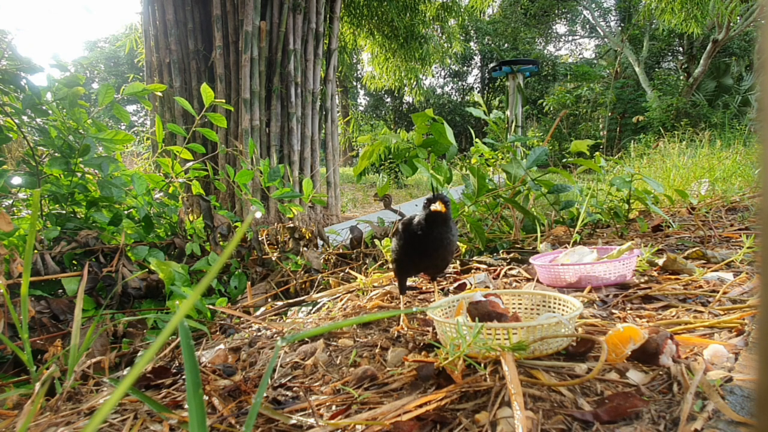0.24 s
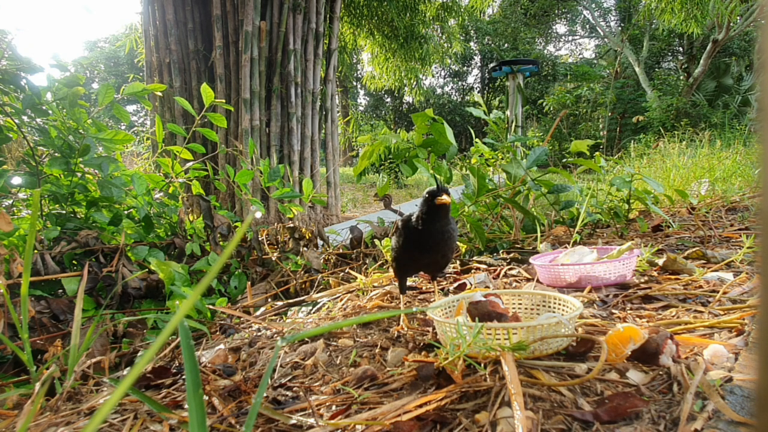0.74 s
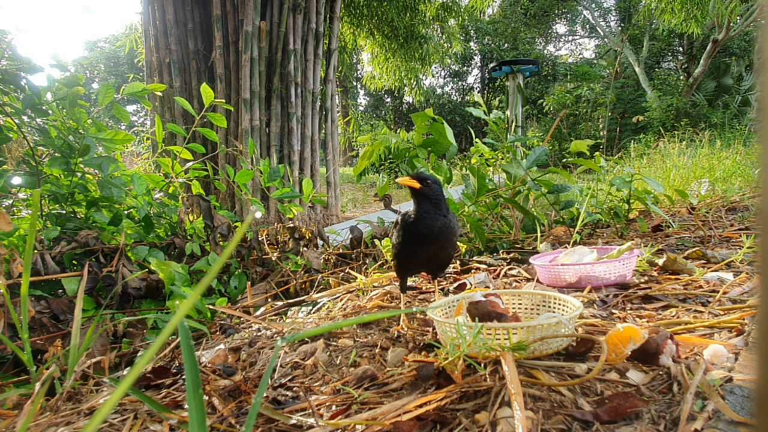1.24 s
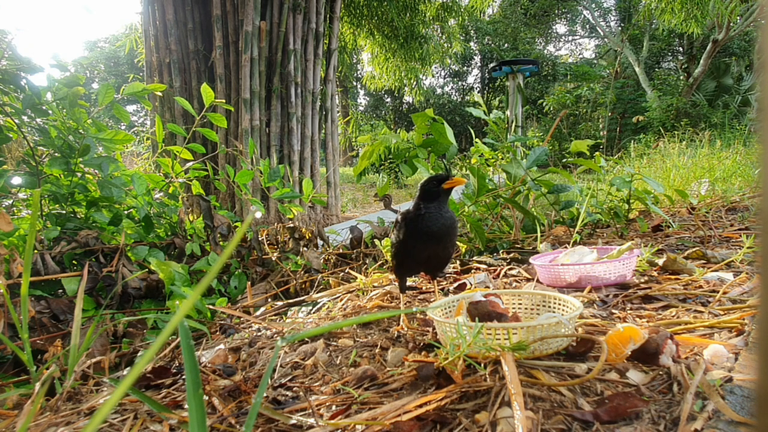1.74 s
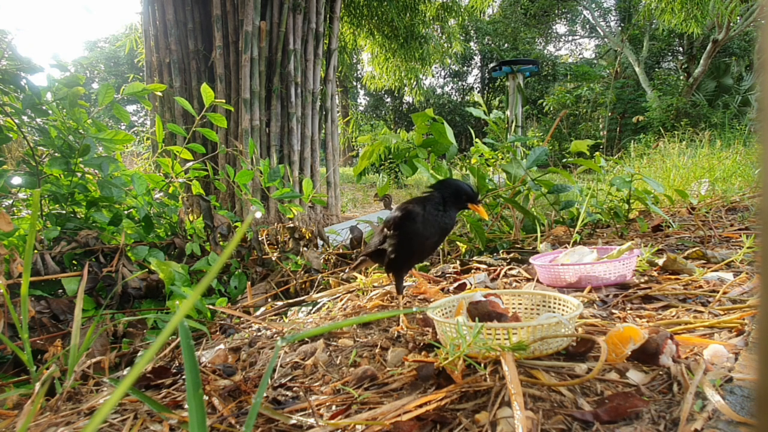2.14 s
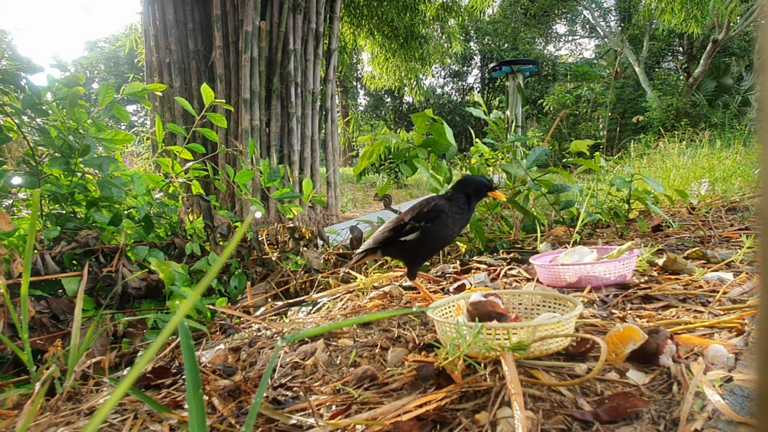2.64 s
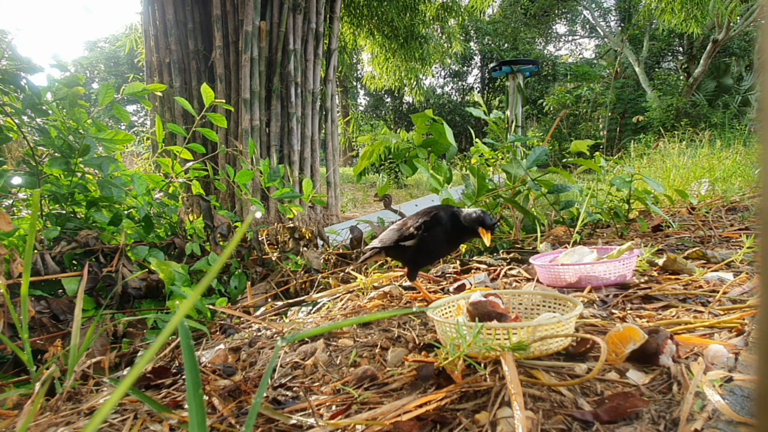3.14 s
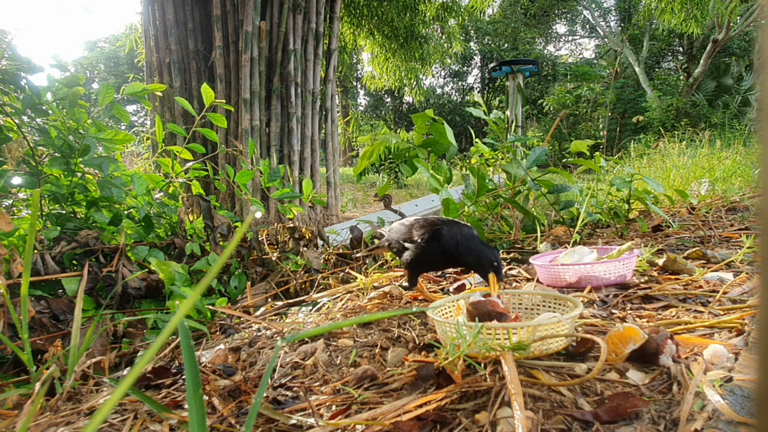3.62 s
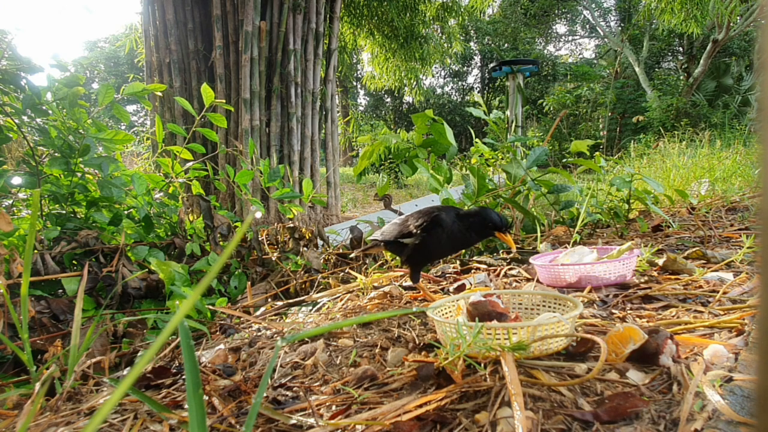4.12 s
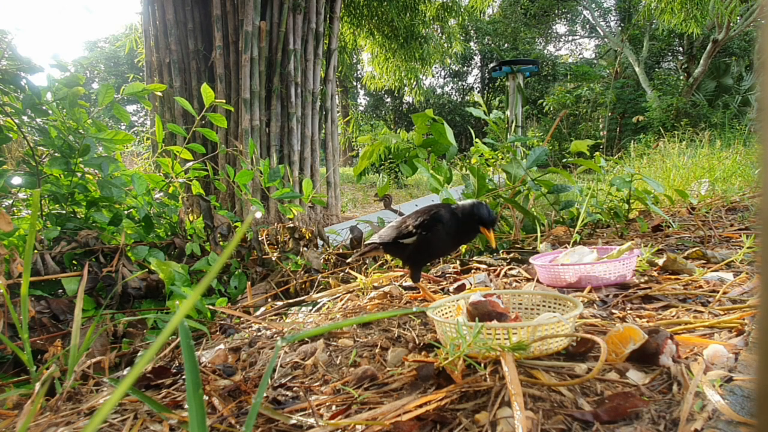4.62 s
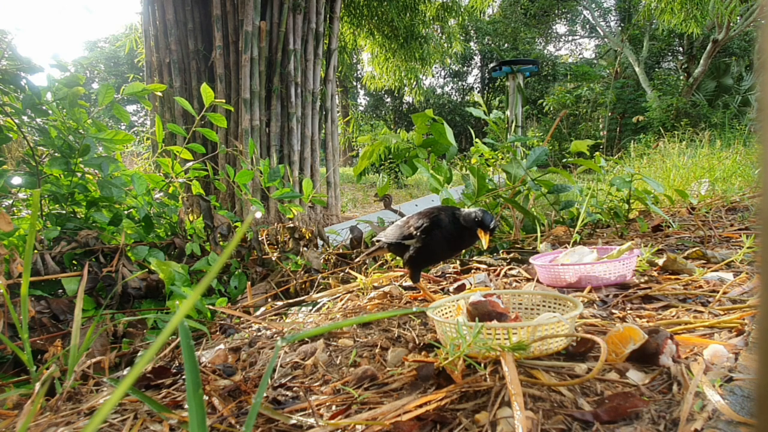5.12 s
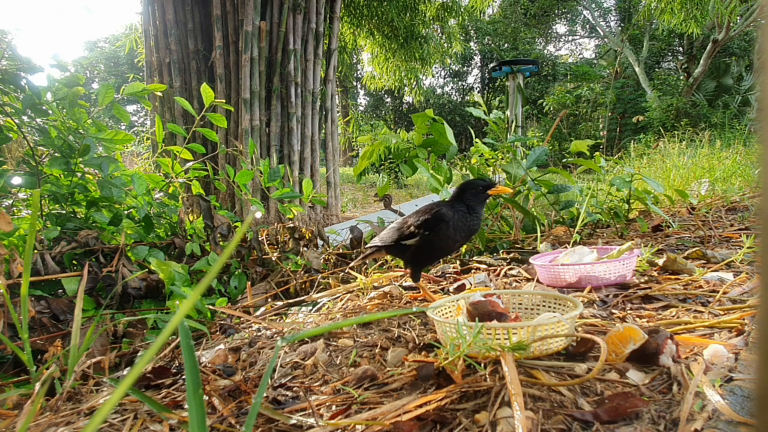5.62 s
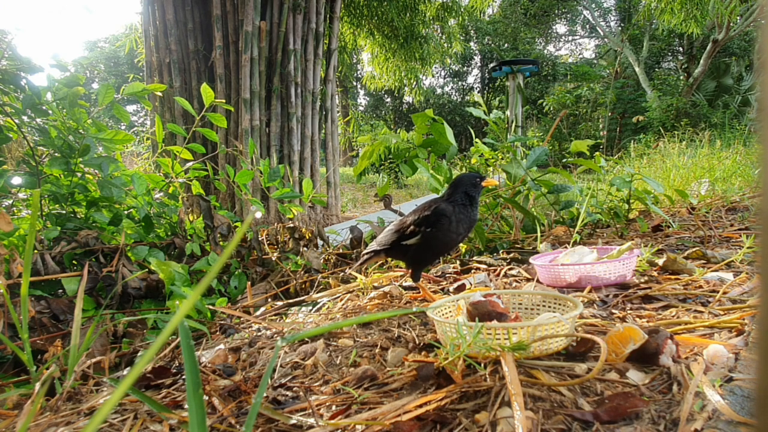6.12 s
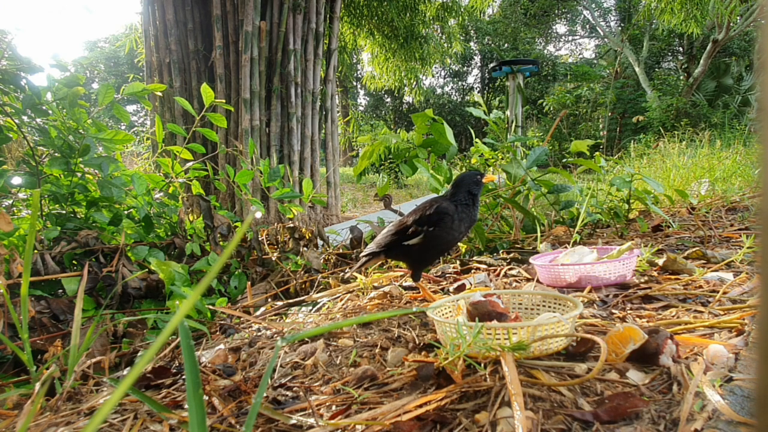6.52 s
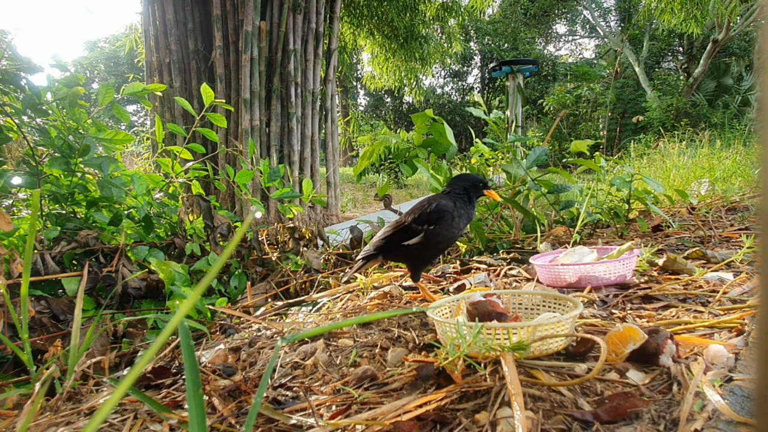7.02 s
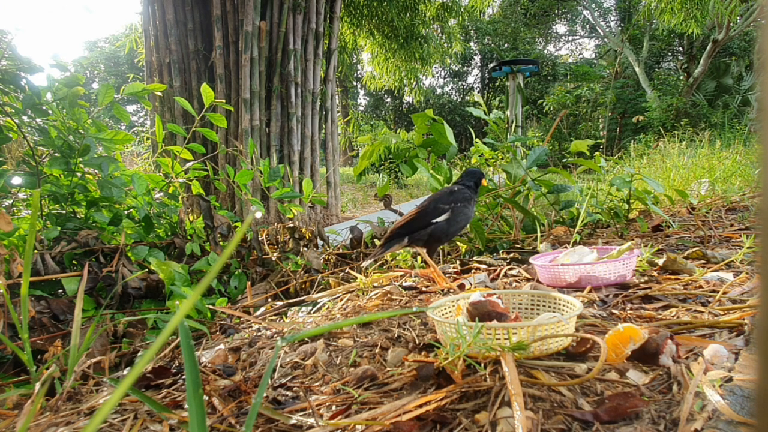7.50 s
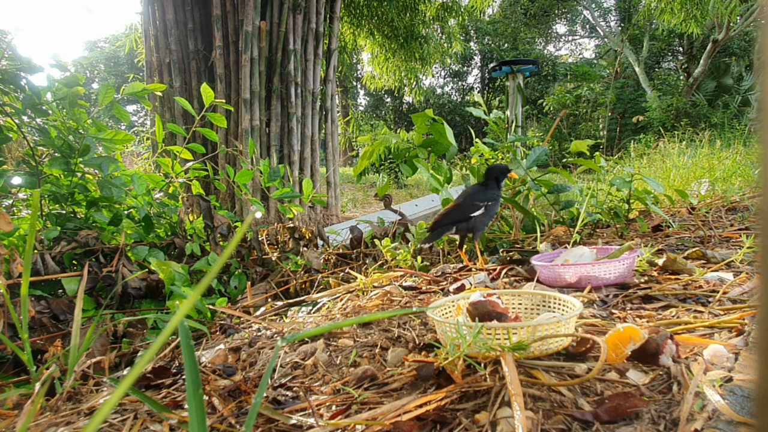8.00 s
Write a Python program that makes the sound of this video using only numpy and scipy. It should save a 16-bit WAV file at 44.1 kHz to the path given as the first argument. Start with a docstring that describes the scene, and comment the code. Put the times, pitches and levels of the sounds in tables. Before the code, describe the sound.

Doves coo near and far in a leafy garden while small birds whistle, a close myna squawks harshly, and low traffic rumbles beneath.

```python
"""Doves coo near and far in a tropical garden: pitch-curved near sines, purring notes chopped unevenly.
Small birds whistle from several perches; a close myna squawks three times, slide into buzz.
A bird steps through dry leaves: crackling noise bursts. Insects, air and far traffic are shaped noise.
The stereo microphone lies on the ground: its left port faces the trees, the right one is shaded."""
import sys
import numpy as np
from scipy import signal
from scipy.fft import rfft, irfft
from scipy.io import wavfile
from scipy.ndimage import uniform_filter1d

SR = 44100
rng = np.random.default_rng(int(sys.argv[2]) if len(sys.argv) > 2 else 0)


def makeup_ratio(level_db):
    """Linear amplitude ratio for a level in decibels (20 dB per factor of ten)."""
    decades = np.asarray(level_db, float) / 20
    return 10 ** decades


def persist_wave(psi):
    """Save psi, clipped to +-1, as 16-bit WAV."""
    counts = np.round(np.clip(psi, -1, 1) * 32767).astype(np.int16)
    wavfile.write(sys.argv[1], SR, np.atleast_2d(counts).T)


N = 364266  # length [samples]

# The near dove's phrase, a long coo and five short ones:
# (time after its start, before slowing [s], length [s], top pitch [Hz], level before effort [dB])
NEAR_PHRASE = [(0.0, .12, 1178, -42), (.122, 0.05, 1198, -43), (0.181, 0.0454, 1173, -41),
               (0.253, 0.0434, 1142, -40), (.335, .044, 1140, -39), (.45, .057, 1138, -41)]
# When the near dove sings it: (time [s], slowness [ratio], effort [dB])
NEAR_PHRASE_TIMES = [(2.079, .975, 1.1), (4.793, 1.025, 0.1), (7.605, 1.0, -1.1)]
# Doves further off, one row a coo: (time [s], length [s], top pitch [Hz], level [dB])
FAR_COOS = [(.23, .12, 1170, -69), (.478, 0.063, 1001, -49), (.551, .166, 1213, -47),
            (.714, 0.055, 1150, -47.5), (.81, 0.039, 1219, -47.5), (.888, .21, 1168, -51),
            (1.786, .097, 1417, -60), (1.86, .094, 1264, -60), (2.637, 0.07, 1150, -61),
            (2.698, 0.081, 1335, -59), (3.322, 0.16, 1304, -56), (3.482, .072, 1283, -56),
            (3.536, .063, 1366, -57), (3.616, 0.052, 1328, -55), (3.692, 0.1, 1230, -53),
            (3.886, .037, 1010, -47.5), (3.906, 0.14, 1197, -56.5), (4.054, 0.041, 1285, -52.8),
            (4.111, 0.048, 1202, -52), (4.198, 0.038, 1210, -51.5), (4.299, 0.086, 1199, -56),
            (4.413, 0.05, 1384, -58), (4.498, 0.058, 1344, -61), (5.21, 0.088, 1230, -47.5),
            (5.312, 0.061, 1292, -50.5), (5.368, .053, 1234, -52), (5.451, .042, 1205, -51.5),
            (5.551, 0.15, 1163, -49.5), (6.05, .11, 1290, -62.5), (6.214, 0.099, 1290, -62.5),
            (6.764, 0.032, 1038, -47), (6.786, .11, 1225, -56.5), (6.882, 0.045, 1335, -52),
            (6.926, 0.045, 1275, -51), (6.994, 0.026, 1232, -50), (7.069, .032, 1230, -48),
            (7.17, 0.06, 1247, -53)]
# Purring notes of a larger dove: (time [s], length [s], pitch [Hz], level [dB], shape name)
PURRS = [(0.048, .09, 770, -60, "short"), (1.73, 0.052, 558, -60, "short"),
         (1.971, 0.16, 743, -51.5, "rising"), (2.331, 0.43, 700, -53.5, "long"),
         (3.269, .13, 766, -59.5, "short"), (3.619, .08, 660, -60, "short"),
         (4.862, 0.058, 576, -57, "short"), (5.079, .16, 742, -52, "rising"), (5.43, .49, 702, -54, "long"),
         (7.19, .4, 707, -60.5, "long")]
# Shapes of its notes, by name: (share of the length [0-1], share of the pitch [ratio], level [dB])
PURR_SHAPES = { "short": [(0, .93, -4), (.45, 1, 0.5), (1, 0.93, -2.5)], "rising": [(0, .72, -7.5),
               (.3, .85, -4), (.45, 0.99, 0), (.7, .95, -0.5), (1, .88, -7.5)], "long": [(0, .92, 0),
               (.12, 1, -0.5), (.35, 0.98, -0.5), (.55, .93, 0), (.72, .85, -0.8), (.87, .79, -9),
               (1, 0.8, -2)]}
# Bouts of the crowd of doves in far trees: (start [s], end [s])
CROWD_BOUTS = [(0.0, .85), (1.95, 2.8), (3.48, 5.3), (4.8, 6), (6.9, 7.3), (7.7, 9.9)]

# Whistles of songbirds, with the myna's two dipping intros and the tail of one squawk (first row):
# (time [s], length [s], pitch [Hz], level [dB], call name, perch name)
WHISTLES = [(0.0, 0.034, 1322, -44.5, "flat", "near"), (0.0, .085, 3884, -58, "flat", "near"),
            (.65, 0.17, 2874, -68, "flat", "thicket"), (0.803, 0.15, 4334, -53.5, "slope", "near"),
            (0.985, .13, 2960, -67, "flat", "thicket"), (1.453, 0.14, 4000, -60.5, "flat", "high"),
            (1.569, .23, 5600, -53, "rise", "thicket"), (1.74, .07, 3380, -59, "arch", "open"),
            (2.499, 0.055, 3560, -71, "flat", "hedge"), (2.618, 0.051, 2646, -47, "chip", "hedge"),
            (2.756, .14, 4230, -57, "slope", "near"), (2.933, .11, 3890, -74, "flat", "near"),
            (2.953, 0.052, 2680, -44.5, "chip", "hedge"), (3.46, .16, 3720, -67.5, "flat", "thicket"),
            (4.43, 0.12, 4270, -60, "drop", "near"), (4.49, .12, 4640, -48, "arch", "high"),
            (4.49, 0.13, 6200, -71, "arch", "high"), (4.751, 0.112, 2100, -70, "flat", "thicket"),
            (4.94, 0.19, 3960, -70, "flat", "high"), (4.97, .14, 3570, -71, "flat", "thicket"),
            (5.643, 0.22, 4524, -53.5, "fall", "near"), (5.922, .13, 4000, -61.5, "flat", "far"),
            (6.54, 0.063, 4020, -58.5, "arch", "hedge"), (6.549, 0.072, 3560, -58.5, "arch", "thicket"),
            (6.865, 0.14, 4494, -57.5, "arch", "high"), (7.048, 0.19, 4405, -45.5, "fall", "near"),
            (7.217, 0.034, 1480, -44, "dip", "open"), (7.288, 0.089, 7600, -63, "arch", "high"),
            (7.799, 0.151, 2962, -49.5, "swell", "open"), (7.818, 0.041, 1480, -43.5, "dip", "open"),
            (7.916, .13, 3990, -57.5, "flat", "far"), (7.939, .09, 3226, -46.5, "climb", "open"),
            (7.967, .17, 2940, -57.5, "flat", "open"), (7.958, 0.18, 5820, -55, "rise", "thicket"),
            (8.16, 0.11, 4070, -53, "climb", "near")]
# Shapes of the calls, by name: (share of the length [0-1], share of the pitch [ratio], level [dB])
CALL_SHAPES = { "fall": [(0, .81, -16), (.08, 1, -2), (.35, .96, -3), (.6, .93, -5.5), (.9, .885, -2),
               (1, .82, -1)], "arch": [(0, .9, -4), (.09, 0.99, -3), (.45, .99, -2), (.75, .95, -1),
               (1, .86, -9)], "flat": [(0, 1.005, -5.5), (.4, 1, 0.3), (1, .98, -6)], "rise": [(0, .66, -9),
               (.22, .72, -10), (.4, .79, -7.5), (.57, .93, 1), (.68, 1.01, -11.5), (1, 1.04, -23)],
               "dip": [(0, 1.12, -11), (.55, 1, 1.5), (1, 1.18, -6)], "chip": [(0, .92, -11), (.4, 1, -0.2),
               (.57, .9, -6), (.61, 0.87, -11), (.67, .72, -16), (.71, .7, -2), (.84, .665, -4.5),
               (1, 0.766, 3)], "slope": [(0, .8, -16), (.09, 1, 4.5), (.25, .96, -8), (.5, 0.94, -3),
               (.75, .91, 2.5), (1, 0.87, -5.5)], "swell": [(0, 1, -11), (.35, .985, -3), (.8, .965, 2),
               (1, 1, -6)], "drop": [(0, 1, -7), (.4, .94, -7), (.75, .915, 1), (1, .8, -5)],
               "climb": [(0, .9, -14), (.35, 0.94, -2.5), (.75, .97, 1), (1, 0.99, -0.5)]}
# Where each perch lies: (left over right [dB], lead of the left port [radians])
PERCHES = {"near": (15.3, 1), "high": (32, -1.8), "thicket": (19, 1.7), "open": (8.3, 2.6),
           "far": (23, 2.9), "hedge": (17, -0.97)}
# Scatter by leaves and pitch jitter of the whistles, by perch:
# (scattered level [dB], pitch jitter [share of the pitch])
SCATTER_AND_JITTER = {"near": (-9, .004), "high": (-13, .0025), "thicket": (-2, .02), "open": (-9, .005),
                      "far": (-6, .007), "hedge": (-6, .016)}

# Clear side of the myna's voice box, one list a squawk: (time [s], pitch [Hz], level [dB])
MYNA_SLIDES = [
    [(1.12, 430, -47), (1.13, 624, -64), (1.138, 1195, -50), (1.15, 1330, -45), (1.16, 1210, -42),
     (1.17, 964, -46), (1.18, 594, -41)],
    [(7.232, 1040, -54.4), (7.24, 1100, -44), (7.247, 1334, -43), (7.256, 1230, -41), (7.266, 1023, -57)],
    [(7.845, 1416, -47.6), (7.86, 1235, -44.5), (7.875, 1137, -42), (7.89, 950, -38)],
]
# Buzzing side, one row a squawk: (time [s], length [s], pitch [Hz], level [dB], bend [exponent])
MYNA_BUZZES = [(1.162, 0.077, 495.6, -28.7, .8), (7.247, 0.071, 488.5, -34, 1.35),
               (7.855, 0.0747, 497, -37.5, 1.297)]
# Course of a buzz as it swells and fades: (share of the length [0-1], share of the pitch [ratio], level [dB])
BUZZ_SHAPE = [(0, 1.16, -11.5), (.15, 1.075, -4.5), (.32, 1.04, -2.5), (.5, 1, -0.8), (.7, 1.005, -4.5),
              (.88, 1.005, -7), (1, 1.02, -13.5)]
# Relative strength of the buzz's harmonics, one row a squawk, one column a harmonic: (level [dB], ...)
BUZZ_HARMONICS = [(-10, -13, -9.5, 1, 2, 3, -5, -32, -23.0, -13, -16, -14, -36, -20),
                  (-16, -4.5, 1.5, -14, -6.5, -1, -16, -10.5, -12, -37, -38, -38, -39.6, -37),
                  (-6.5, -5, 2.5, -4, -10, -10, -18, -28.5, -17, -29.9, -27, -33.6, -36.1, -45.8)]
# Roughness of each squawk: (rasping air [dB], lines between the harmonics [dB],
# overtones of the slide [dB], sum tone [dB])
MYNA_GRIT = [(-18.5, -5, -0.5, -8), (-19, -14, -11, -2), (-15.5, -8, -11, -9)]
# Colour of the rasping air: (frequency [Hz], relative level [dB])
RASP_COLOUR = [(300, -45), (900, -24), (1800, -8), (2800, 0), (4200, -3), (6000, -9), (8000, -22),
               (14000, -45)]
# Stereo place of the myna's buzz: (frequency [Hz], left over right [dB])
MYNA_SHADE = [(500, 9.5), (1000, 10.5), (1500, 3), (2000, 22), (2500, 22), (3500, 11), (6000, 29)]
# Its phase at the ports: (frequency [Hz], lead of the left port [radians])
MYNA_LEAD = [(500, -0.78), (1000, -1), (1500, -1.7), (2000, -1.2), (3000, -0.51), (6000, -1.8)]

# Leaf steps; the first row is the broadband end of a call already under way:
# (time [s], level [dB], decay length [s], centre frequency [Hz])
LEAF_STEPS = [(0, -51, 0.057, 2220), (2.841, -54.5, 0.11, 800), (3.969, -47, 0.15, 363),
              (4.157, -51, 0.22, 560), (6.378, -48.5, 0.11, 520), (7.722, -61, 0.29, 5800),
              (7.765, -68, 0.099, 9800), (7.875, -63, 0.073, 11800), (7.226, -56, 0.044, 3480),
              (8.046, -61, 0.17, 6300)]
# Twig ticks: (time [s], level [dB])
TWIG_TICKS = [(1.0934, -74), (1.3843, -60), (2.018, -59), (2.4618, -57), (3.1564, -61), (3.2144, -64),
              (3.4002, -60), (4.1896, -60), (4.497, -63)]
# Echoes off trunks and a wall: (delay [s], level [dB])
ECHOES = [(.022, -14.5), (.041, -11.5)]

# Colour of the traffic rumble: (frequency [Hz], relative level [dB per Hz])
RUMBLE_COLOUR = [(15, -29), (28, -11), (38, -9.5), (48, -2.5), (58, 2), (68, 2.5), (80, -3), (100, -3),
                 (140, -7.5), (200, -12.5), (300, -23), (450, -43), (900, -59)]
# Its course: (time [s], level [dB])
RUMBLE_LEVEL = [(0.0, -49), (1.17, -44.5), (1.24, -49), (2.51, -46), (5.8, -47.5), (6.05, -51), (6.17, -45),
                (6.3, -55), (6.35, -43.5), (6.53, -48.5), (7.29, -45), (7.36, -50), (7.64, -45.5),
                (8.26, -47.5)]
# A motor draws away, another nears: (time [s], level [dB])
MOTOR_LEVEL = [(0.0, -52), (.45, -60.5), (.96, -59.5), (1.3, -68), (4.5, -68), (6.4, -71.5), (7.3, -68),
               (8.26, -66)]
# Colour of the air: (frequency [Hz], relative level [dB per Hz])
AIR_COLOUR = [(180, -25.5), (300, -5.5), (461, -13), (581, -3.5), (863, -8.5), (1160, -7), (2110, -22),
              (2790, -24), (3460, -19.5), (4010, -21.5), (4730, -19), (5580, -23), (7390, -28),
              (9160, -25.5), (15500, -40)]
# Throb of the insect band: (time [s], level [dB])
INSECT_LEVEL = [(0.0, -74), (1.06, -68.5), (1.38, -76), (2.32, -69), (2.57, -75.5), (3.7, -73), (6.83, -77),
                (7.11, -70), (7.38, -74), (8.26, -69.5)]
# Chatter of far birds, one row a burst:
# (middle [s], half length [s], relative level [dB], centre frequency [Hz])
CHATTER_BURSTS = [(0.0, 0.22, -3.5, 3420), (.56, 0.11, 4, 3300), (.9, 0.12, 3.5, 4000),
                  (1.05, .07, 9, 2800), (1.63, .13, -0.5, 3870), (2.8, 0.18, -4, 3100),
                  (3.2, 0.15, 0.5, 2280), (3.85, .4, -9.5, 3230), (4.9, .28, -4, 3522),
                  (5.9, 0.14, -3, 4000), (6.4, 0.39, -8, 3700), (7.04, 0.17, -4, 4050),
                  (7.5, 0.17, -5.5, 3200), (8.08, 0.16, 4, 3120)]
# Shading of the right port: (frequency [Hz], left over right [dB])
PORT_SHADE = [(60, 3), (99, 2.5), (160, 6), (270, 5), (450, 11), (740, 10), (1220, 8), (2010, 6),
              (3330, 9.5), (5500, 21), (9080, 12.5), (15000, -2)]
# Likeness of the ports in diffuse sound: (frequency [Hz], left-right correlation [-1 to 1])
PORT_LIKENESS = [(30, 0.96), (60, 0.94), (130, 0.92), (290, 0.73), (640, 0.4), (1410, -0.11), (3100, -0.28),
                 (6820, 0.2), (15000, -0.21)]


def evened(x):
    """Scales to rms 1."""
    return x / np.sqrt(np.mean(x ** 2) + 1e-20)


def read(points, hz):
    """Reads a spectrum on a log-frequency axis."""
    f, value = np.transpose(points)
    return np.interp(np.log(hz + 1), np.log(f + 1), value)


def add(mix, s, sound):
    """Mixes a stereo sound in at time s."""
    part = mix[:, round(s * SR):][:, :sound.shape[1]]
    part += sound[:, :part.shape[1]]


def drift(length, size):
    """Smooth random wandering of rms 1; size is the smoothing in samples."""
    return evened(uniform_filter1d(uniform_filter1d(rng.standard_normal(length), size), size))


def bump(hz, centre_hz, octaves):
    """A bell-shaped band in dB."""
    return -6 * (np.log2((hz + 1) / centre_hz) / octaves) ** 2


def level_curve(rows):
    """Gain of a level curve, sample by sample."""
    s, db = np.transpose(rows)
    return makeup_ratio(np.interp(np.arange(N) / SR, s, db))


def note(shape, s, length, hz, db, bend=1):
    """Stretches a shape into rows (time [s], pitch [Hz], level [dB]); bend deepens or flattens its glide."""
    share, pitch, level_db = np.transpose(shape)
    return np.transpose([s + length * share, hz * pitch ** bend, db + level_db])


def spread(rows, edge):
    """Pitch and gain of a note, sample by sample; edge is the share of its length spent in soft ends."""
    s, hz, db = np.transpose(rows)
    t = np.arange(s[0], s[-1], 1 / SR)
    hz = uniform_filter1d(np.interp(t, s, hz), size=200, mode="nearest")
    soft_ends = signal.windows.tukey(len(t), np.clip(edge, 0, 1))
    return hz, makeup_ratio(np.interp(t, s, db)) * soft_ends


def tone(hz, gain, shade_db, lead, wobble):
    """A near sine on a jittering pitch curve; the left port leads in phase, the right one is weaker."""
    turns = np.cumsum(hz * (1 + wobble * drift(len(hz), size=90))) / SR + rng.random()
    left = np.sin(2 * np.pi * turns + lead)
    right = np.sin(2 * np.pi * turns) / makeup_ratio(shade_db)
    return np.sqrt(2) * gain * np.array([left, right])


def noise(colour_db, patchy_db, size=1024):
    """Diffuse noise coloured by colour_db(hz, t), with drifting patches; the mean of the ports has rms 1."""
    hz, hop = np.fft.rfftfreq(size, 1 / SR)[:, None], size // 4
    t = np.arange(N // hop + 5) * hop / SR
    a, b, c, d, patches = rng.standard_normal((len(t), len(hz), 5)).T
    patches = evened(uniform_filter1d(uniform_filter1d(patches, 10, 0), 12, 1))
    same = np.clip(read(PORT_LIKENESS, hz), -1, 1)
    left = a + 1j * b
    right = same * left + np.sqrt(1 - same ** 2) * (c + 1j * d)
    right = right / makeup_ratio(read(PORT_SHADE, hz))
    z = np.array([left, right]) * makeup_ratio(colour_db(hz, t) + patchy_db * patches)
    x = signal.istft(z, nperseg=size, noverlap=size - hop)[1][:, :N]
    return x / np.sqrt(np.mean(x.mean(0) ** 2))


def garden(x, t60):
    """Trunks and leaves scatter the calls: sparse taps of random sign die away, 60 dB in t60 seconds."""
    at = np.arange(500, 30000, 20) + rng.integers(0, 20, (2, 1475))
    taps = np.zeros((2, 30020))
    signs = rng.choice([-1., 1.], at.shape)
    np.put_along_axis(taps, at, signs * makeup_ratio(-60 * at / SR / t60), 1)
    wet = signal.fftconvolve(x[:1], taps / np.linalg.norm(taps[0]), axes=1)[:, :N]
    return wet / makeup_ratio([[0], [11]])  # the right port is shaded by 11 dB


def coo(length, top_hz, db, lag, sag_hz):
    """The pitch scoops up, holds, sags (rises if sag_hz is negative) and hooks down; the throat flutters."""
    t = np.arange(0, length, 1 / SR)
    scoop = 1 - 0.329 * np.maximum(1 - t / min(0.03, 0.451 * length), 0) ** 1.39
    hook = 1 - 0.15 * np.exp((t - length) / 0.0144)
    hz = scoop * hook * (top_hz - sag_hz * (t / length) ** 2.75)
    shape = np.minimum(t / .009, 1) * np.minimum((length - t) / 0.014, 1)
    flutter_db = 1.7 * drift(len(t), size=300)
    return tone(hz, shape * makeup_ratio(db + flutter_db), 11.7, -lag, wobble=0.0065)


def single_doves():
    """Coos of the near dove and of those further off, as two mixes; short coos sag most."""
    near, far = np.zeros((2, 2, N))
    near_lag, far_lag = 1.64, 3.18  # lag of the left port [radians]
    coos = [(s + slow * after, length, hz, db + effort_db, near_lag, near)
            for s, slow, effort_db in NEAR_PHRASE_TIMES for after, length, hz, db in NEAR_PHRASE]
    coos += [(*row, far_lag, far) for row in FAR_COOS]
    for s, length, hz, db, lag, mix in coos:
        add(mix, s, coo(length, hz, db, lag, sag_hz=260 * np.exp(-length / .06)))
    return near, far


def purring_dove():
    """A larger dove purrs: beats near 43 a second chop its note unevenly and shake its pitch."""
    out = np.zeros((2, N))
    for *row, kind in PURRS:
        hz, gain = spread(note(PURR_SHAPES[kind], *row), edge=0.083)
        beats = np.cumsum(43 * (1 + 0.2 * drift(len(hz), size=900))) / SR
        chop = (1 + 0.5 * np.sin(2 * np.pi * beats)) * makeup_ratio(1.05 * drift(len(hz), size=700))
        shaken_hz = hz * (1 - 0.053 * np.cos(2 * np.pi * beats))
        add(out, row[0], tone(shaken_hz, gain * chop, 10.8, 0.24, wobble=0.018))
    return out


def dove_crowd():
    """Short faint coos at random times from far trees swell in bouts and sink between them."""
    crowd = np.zeros((2, N))
    for when, long, high, loud in rng.random((150, 4)):
        call = coo(0.0396 + 0.076 * long, 1000 + 290 * high, -7 + 4 * loud, 2.6, sag_hz=-140)
        add(crowd, when * N / SR, call)
    t = np.arange(N) / SR
    bout_db, lull_db, fade_s = -57.5, -78, 0.1
    inside_s = np.max([np.minimum(t - start, end - t) for start, end in CROWD_BOUTS], 0)
    bouts = np.clip(inside_s / fade_s + 1, 0, 1)
    return makeup_ratio(lull_db + (bout_db - lull_db) * bouts) * crowd


def doves():
    """All doves, with discrete echoes and the garden's scatter; the near dove is drier."""
    near, far = single_doves()
    far = far + purring_dove() + dove_crowd()
    echoes = np.zeros((2, N))
    for delay, db in ECHOES:
        add(echoes, delay, makeup_ratio(db) * (far + near))
    return far + near + echoes + garden(makeup_ratio(-4.5) * far + makeup_ratio(-8.0) * near, t60=0.68)


def whistles():
    """Thin near sines with jittering pitch flicker in level on the way through leaves, which scatter them."""
    out, scattered = np.zeros((2, 2, N))
    for s, length, pitch_hz, db, call, perch in WHISTLES:
        scatter_db, jitter = SCATTER_AND_JITTER[perch]
        hz, gain = spread(note(CALL_SHAPES[call], s, length, pitch_hz, db), edge=.008 / length)
        flicker = makeup_ratio(3.0 * drift(len(hz), size=260))
        hz = hz * (1 + .005 * drift(len(hz), size=450))  # slow wavering of the pitch
        whistle = tone(hz, gain * flicker, *PERCHES[perch], wobble=jitter)
        add(out, s, whistle)
        add(scattered, s, makeup_ratio(scatter_db) * whistle)
    for delay, db in ECHOES:
        add(out, delay, makeup_ratio(db + 7.5) * scattered)
    return out + garden(scattered, t60=0.55)


def myna_slide(slide, buzz, over_db, sum_db):
    """The clear side glides with two overtones; where both sides sound they mix into a sum tone."""
    out = np.zeros((2, N))
    start = slide[0][0]
    hz, gain = spread(slide, edge=0.23)
    for k, db in enumerate([0, over_db, over_db - 8]):
        add(out, start, tone((k + 1) * hz, gain * makeup_ratio(db), 21, -0.19, wobble=0.0013))
    t = start + np.arange(len(hz)) / SR
    s, buzz_hz, _ = np.transpose(buzz)
    both = gain * np.clip((t - s[0]) / 0.012 + 1, 0, 1)
    sum_hz = hz + 3 * np.interp(t, s, buzz_hz)  # slide plus the buzz's third harmonic
    add(out, start, tone(sum_hz, both * makeup_ratio(sum_db), 15, -1.3, wobble=0.0053))
    return out


def myna_buzz(buzz, colour, between_db, rasp_db, rasp):
    """The buzzing side sounds fluttering harmonics, early lines between them, and rasping air."""
    out = np.zeros((2, N))
    start = buzz[0][0]
    hz, gain = spread(buzz, edge=0.1)
    share = makeup_ratio(colour) / np.linalg.norm(makeup_ratio(colour))
    # inharmonic lines between the harmonics, early on
    between = makeup_ratio(between_db) * np.clip(np.linspace(2.2, -1.2, len(hz)), 0, 1)
    closing_db = np.linspace(.2, 1.6, len(hz))  # the beak shuts: high harmonics fade first
    opening_db = 7.0 * np.exp(-np.arange(len(hz)) / SR / 0.012)  # and they need a moment to build up
    for k, part in enumerate(share):
        above = max(k - 6, 0)  # harmonics above the seventh
        for multiple, strength in (k + 1, 1), (k + 1.3, between):
            flutter_db = (3.0 + 0.059 * k) * drift(len(hz), size=150)
            course = makeup_ratio(flutter_db - closing_db * above - (k > 2) * opening_db)
            f = multiple * hz
            line = tone(f, gain * part * strength * course, read(MYNA_SHADE, f), read(MYNA_LEAD, f),
                        wobble=0.0042 + 0.0014 * above)
            add(out, start, line)
    add(out, start, makeup_ratio(rasp_db) * gain * rasp[:, round(start * SR):][:, :len(hz)])
    return out


def myna():
    """Each squawk runs from the clear side of the voice box into the buzzing one; close, so nearly dry."""
    out = np.zeros((2, N))
    rasp = noise(lambda hz, t: read(RASP_COLOUR, hz), patchy_db=3.5, size=256)
    for slide, row, colour, grit in zip(MYNA_SLIDES, MYNA_BUZZES, BUZZ_HARMONICS, MYNA_GRIT):
        rasp_db, between_db, over_db, sum_db = grit
        buzz = note(BUZZ_SHAPE, *row)
        out += myna_slide(slide, buzz, over_db, sum_db)
        out += myna_buzz(buzz, colour, between_db, rasp_db, rasp)
    return out + makeup_ratio(-33) * garden(out, t60=0.27)


def leaves():
    """Leaf steps, and the end of a call at the start, are crackling decaying noise bursts; twigs tick."""
    out = np.zeros((2, N))
    for s, db, length, hz in LEAF_STEPS:
        t = np.arange(0, 2 * length, 1 / SR)
        crackle = rng.standard_normal(len(t)) * makeup_ratio(3.1 * drift(len(t), size=60))
        edges = np.clip([hz / (1.2 + 160 / hz), hz * (1.185 + 160 / hz)], 20, .48 * SR)
        band = signal.butter(2, edges, "band", fs=SR, output="sos")
        burst = evened(signal.sosfilt(band, crackle))
        burst = makeup_ratio(db) * burst * np.minimum(t / 0.0028, 1) * np.exp(-1.5 * t / length)
        add(out, s, burst / makeup_ratio([[0], [read(PORT_SHADE, hz)]]))
    for s, db in TWIG_TICKS:
        tick = np.convolve(rng.standard_normal(91), [1, 0, -1], "valid") * np.exp(-np.arange(89) / 14)
        add(out, s, makeup_ratio(db) * tick / makeup_ratio([[0], [6]]))
    return out


def chatter_colour(hz, t):
    """Each burst of far chatter swells and fades in its own band; bursts add in power."""
    power = sum(makeup_ratio(db + bump(hz, centre_hz, 0.33) - 4.3 * ((t - s) / half) ** 2) ** 2
                for s, half, db, centre_hz in CHATTER_BURSTS)
    return 10 * np.log10(power + 1e-20)


def background():
    """Traffic rumble, motor drone, air, a throbbing insect band and blurred chatter, all shaped noise."""
    chatter = makeup_ratio(-74) * noise(chatter_colour, patchy_db=5.0)
    insects = level_curve(INSECT_LEVEL) * noise(lambda hz, t: bump(hz, 4745, 0.075), patchy_db=2.0, size=256)
    air = makeup_ratio(-65) * noise(lambda hz, t: read(AIR_COLOUR, hz), patchy_db=2.3)
    drone = level_curve(MOTOR_LEVEL) * noise(lambda hz, t: bump(hz, 271, 0.69), patchy_db=2.0)
    rumble = noise(lambda hz, t: read(RUMBLE_COLOUR, hz), patchy_db=-0.37, size=4096)
    return chatter + insects + air + drone + level_curve(RUMBLE_LEVEL) * rumble


def scene():
    """All sources as they reach the two ports."""
    return doves() + whistles() + myna() + leaves() + background()


def roll_off(x):
    """The treble ends steeply here."""
    return signal.sosfilt(signal.butter(12, 15690, fs=SR, output="sos"), x)


def record(dry):
    """The microphone cuts deep bass; its housing cancels a narrow band and dulls the top."""
    hz = np.fft.rfftfreq(N, 1 / SR)
    dip = 1 - np.array([[.5], [.2]]) * makeup_ratio(bump(hz, 7580, 0.051))  # deeper in the left port
    low_cut = 1 / np.sqrt(1 + (42 / (hz + 1)) ** 9)
    shelf = makeup_ratio(-4 / (1 + (11700 / (hz + 1)) ** 60))
    mix = irfft(rfft(dry) * dip * low_cut * shelf, N)
    return roll_off(mix)


dry = scene()
out = record(dry)
persist_wave(out)
```